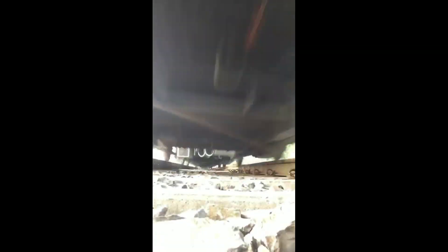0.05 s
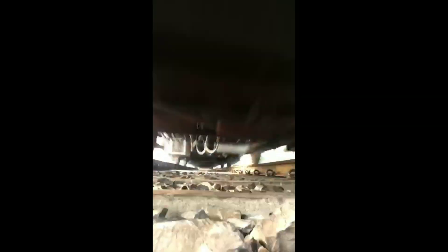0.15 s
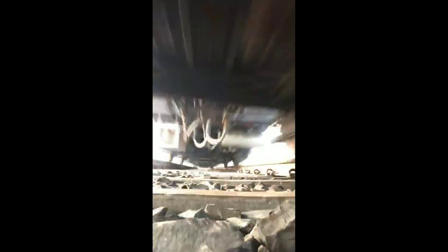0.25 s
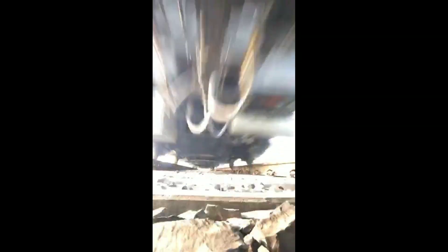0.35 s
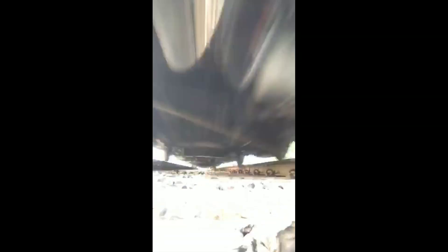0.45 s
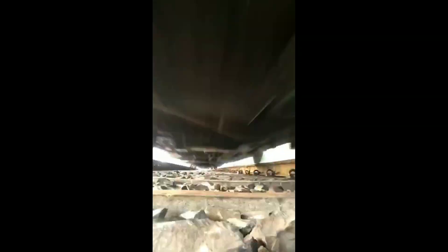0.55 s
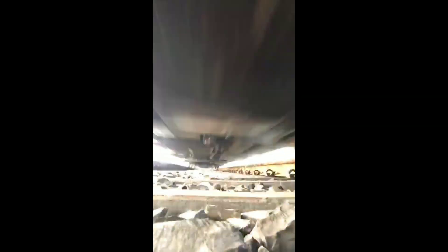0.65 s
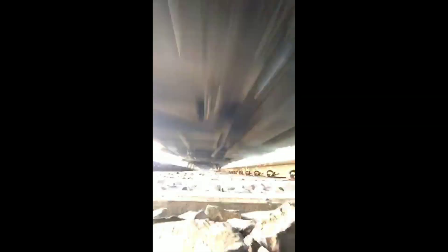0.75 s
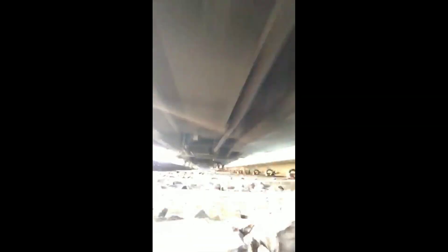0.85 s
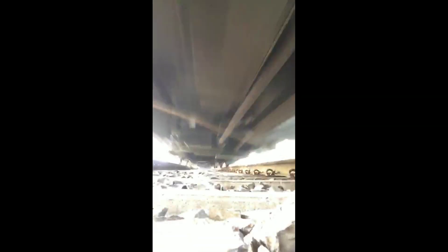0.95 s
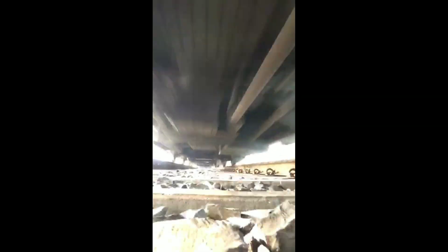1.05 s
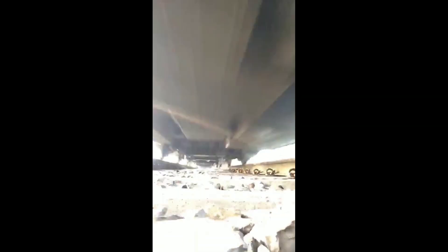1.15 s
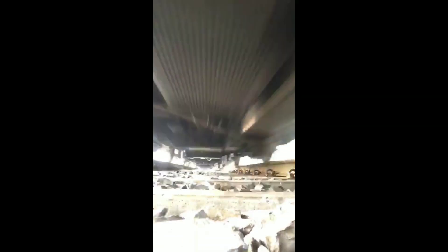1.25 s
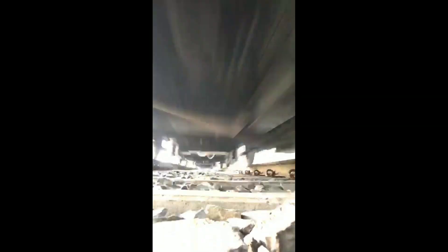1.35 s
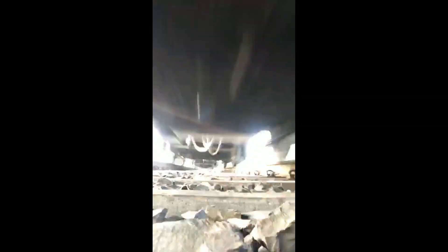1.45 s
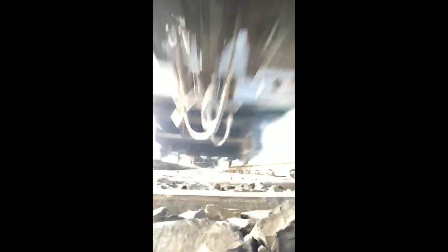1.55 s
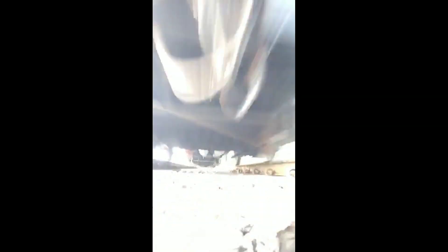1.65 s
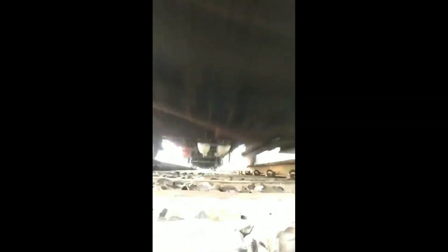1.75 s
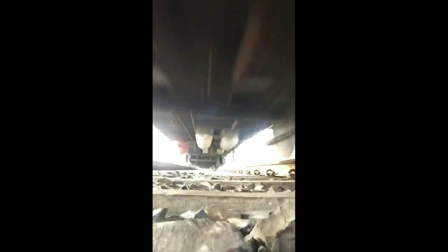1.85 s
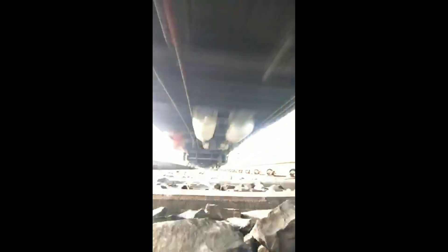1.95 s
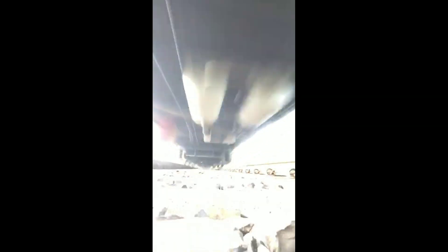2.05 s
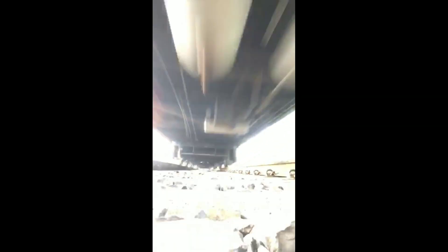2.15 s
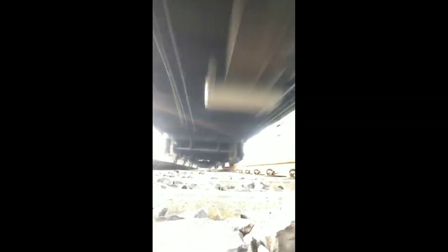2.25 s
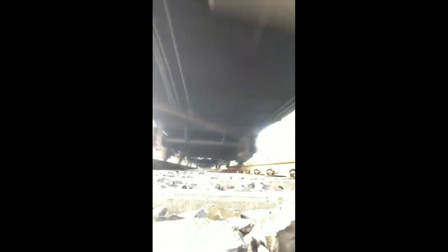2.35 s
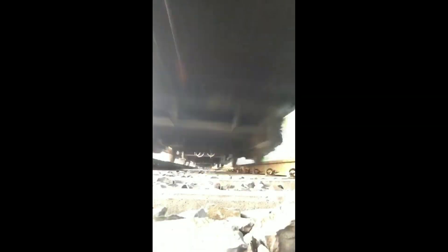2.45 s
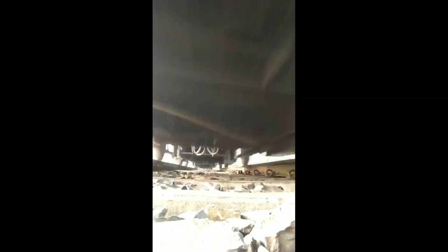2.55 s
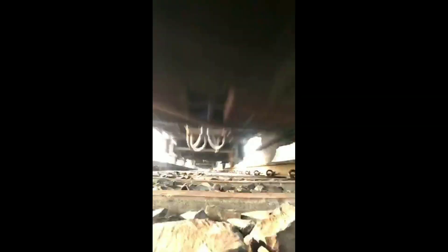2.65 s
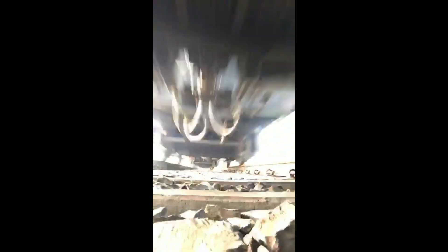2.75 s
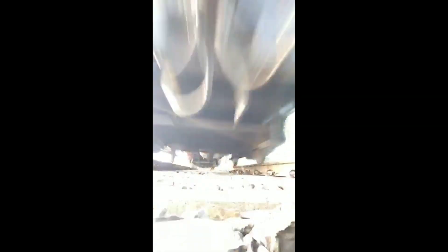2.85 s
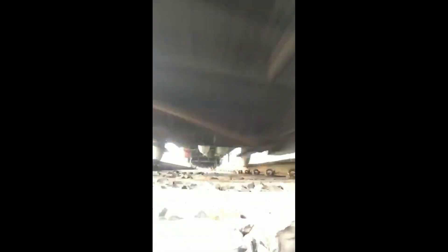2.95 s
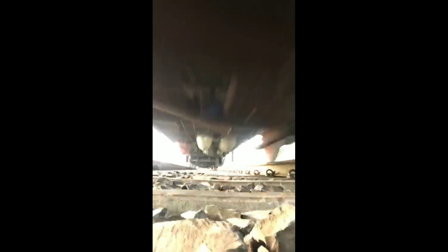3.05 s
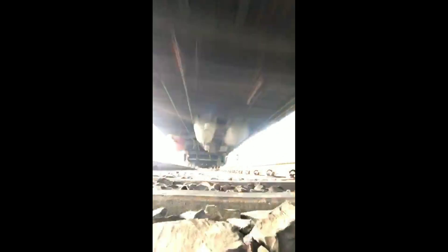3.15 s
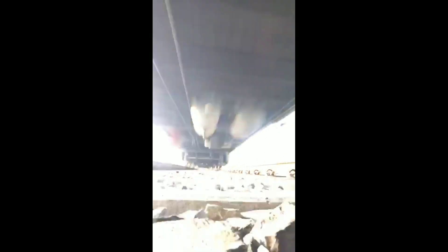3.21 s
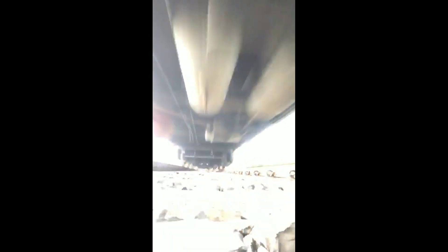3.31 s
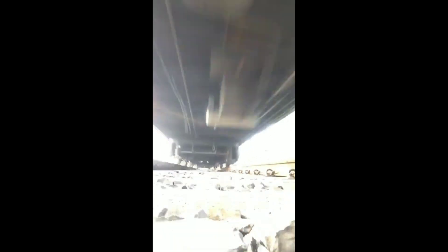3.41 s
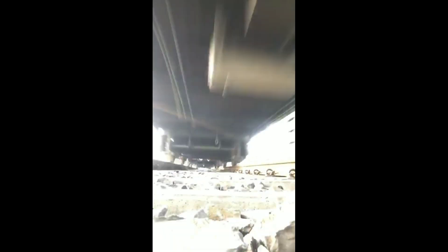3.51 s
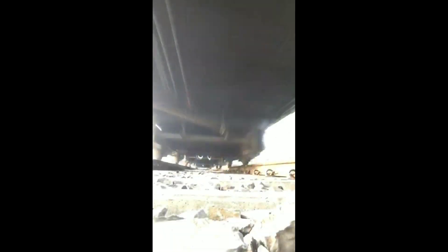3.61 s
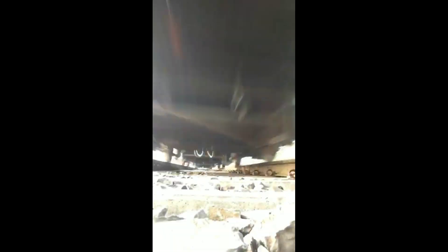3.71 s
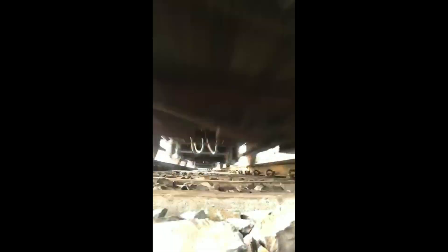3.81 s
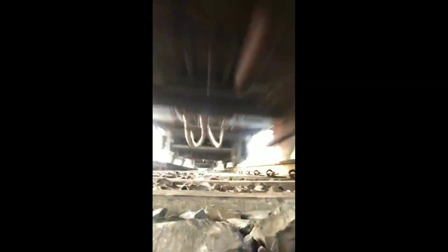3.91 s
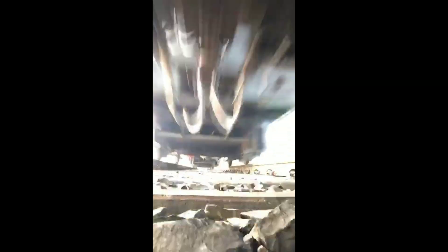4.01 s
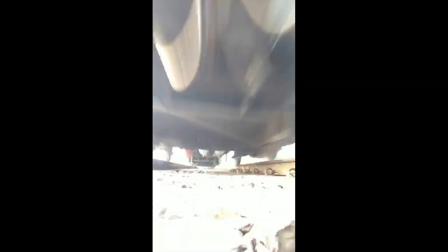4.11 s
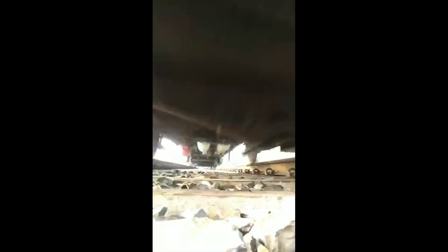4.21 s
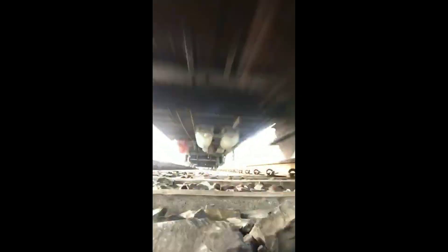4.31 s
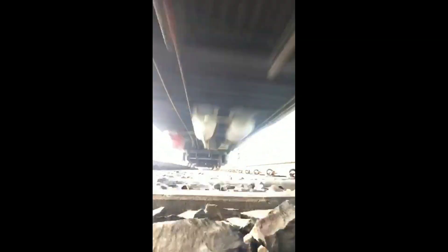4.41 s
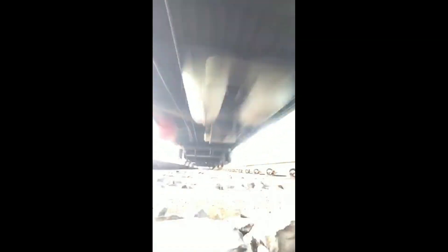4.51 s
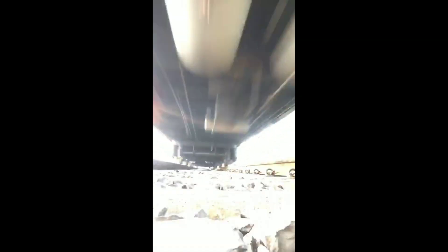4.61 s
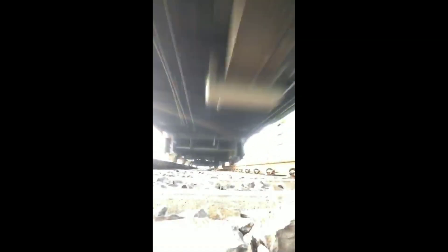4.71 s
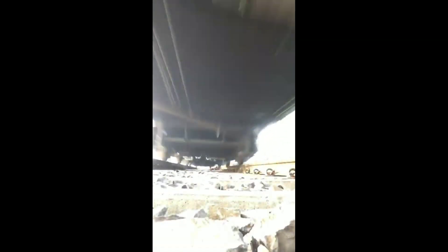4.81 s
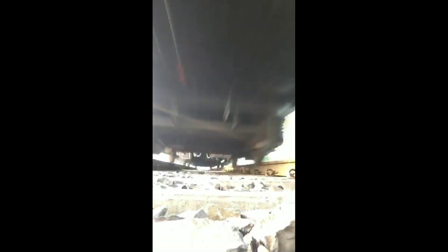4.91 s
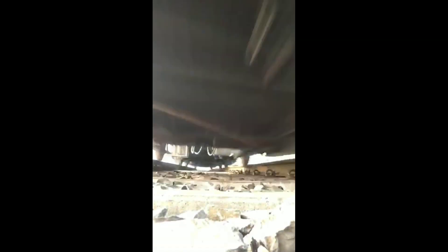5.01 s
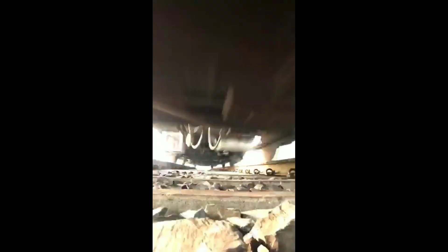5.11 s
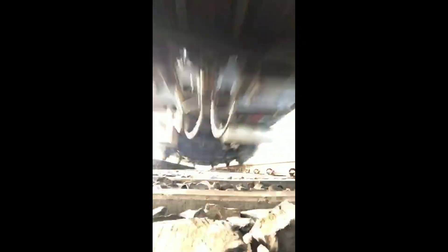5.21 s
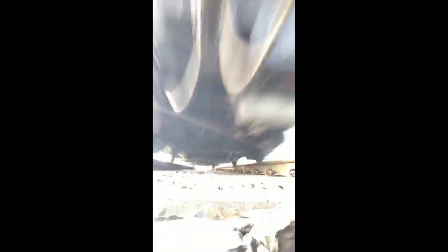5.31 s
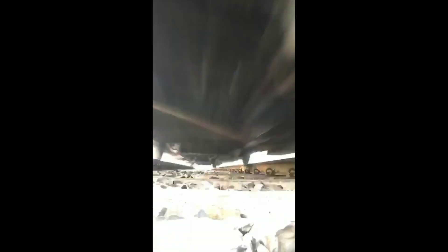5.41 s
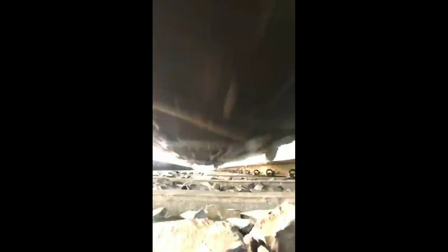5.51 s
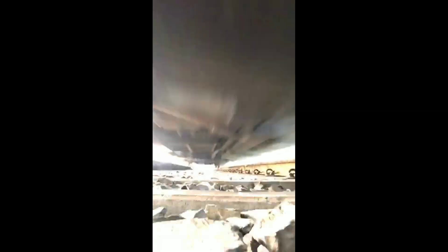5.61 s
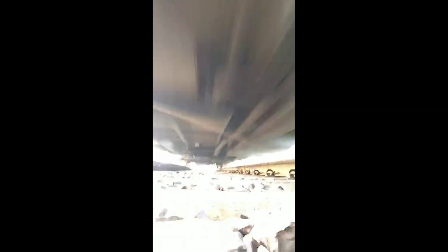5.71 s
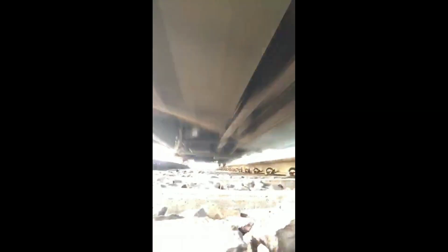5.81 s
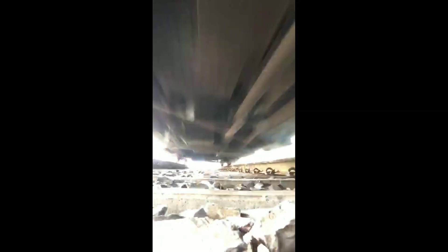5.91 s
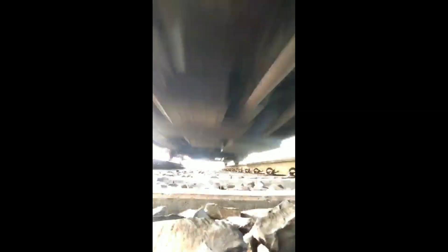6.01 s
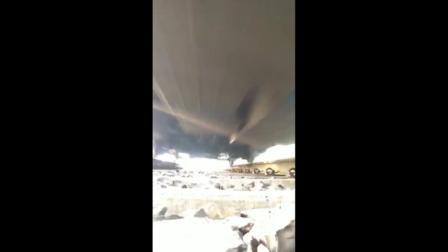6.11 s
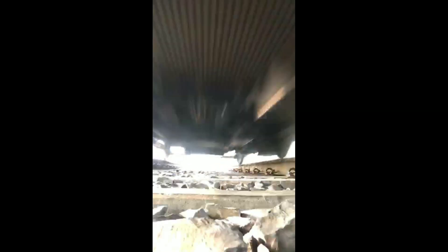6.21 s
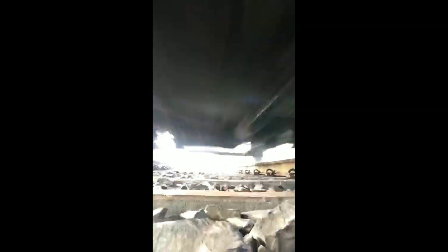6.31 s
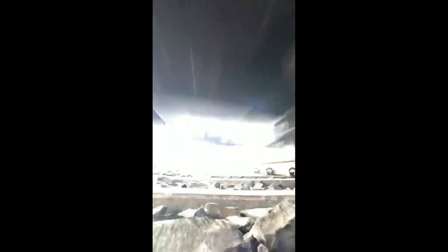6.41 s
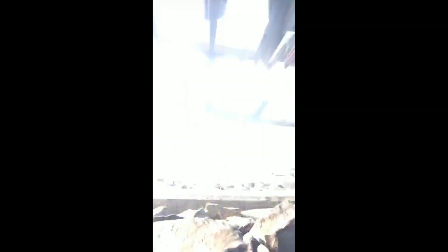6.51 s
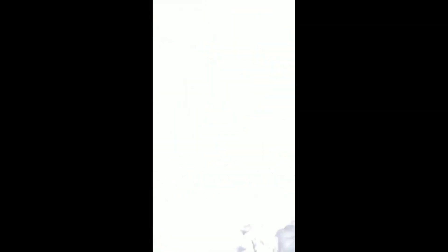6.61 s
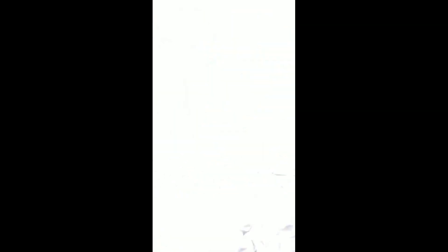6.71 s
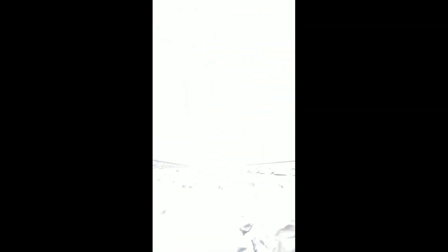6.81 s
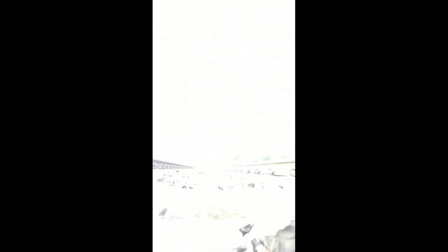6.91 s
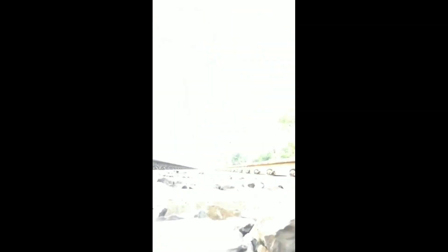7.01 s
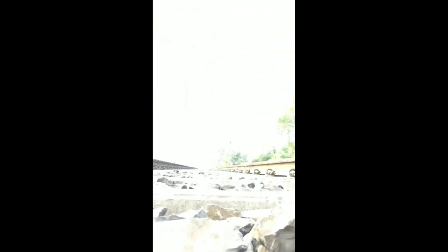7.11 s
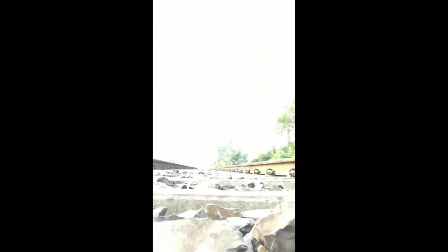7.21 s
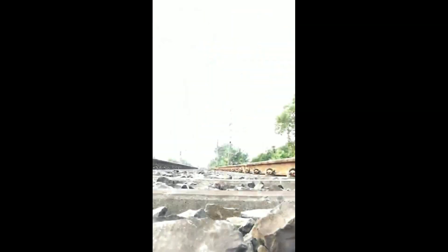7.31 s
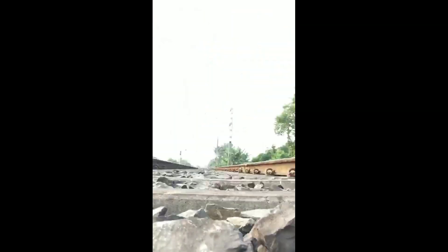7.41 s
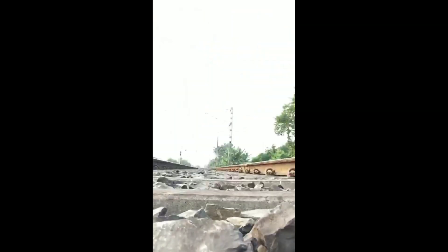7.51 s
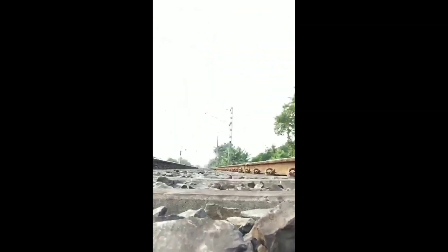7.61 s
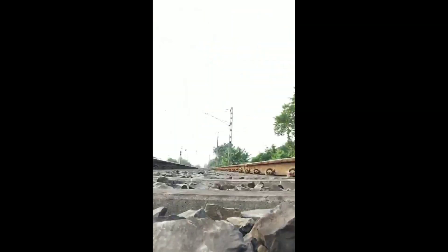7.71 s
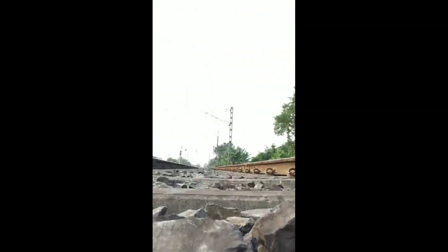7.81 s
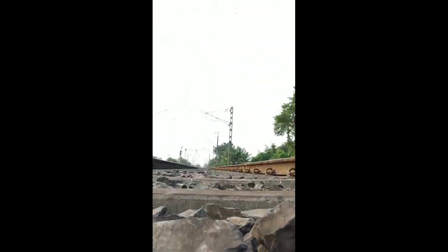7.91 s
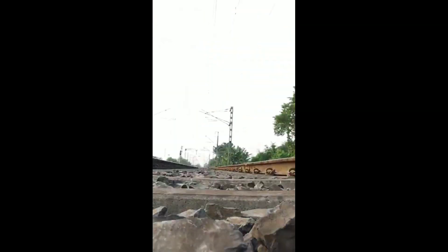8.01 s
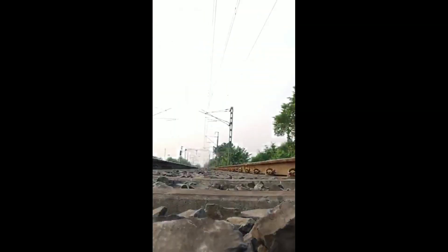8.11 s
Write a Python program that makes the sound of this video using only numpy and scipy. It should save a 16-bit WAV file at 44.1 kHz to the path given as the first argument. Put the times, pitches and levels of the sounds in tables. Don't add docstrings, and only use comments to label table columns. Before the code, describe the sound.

Open-air railway track, microphone on the stones between the rails, with a train passing overhead. At 0 seconds a low gust and distant joint ticks and knocks; from 0.4 the first close steel bangs, four axles by 0.95. Similar fast groups follow around 1.6-2.2, 2.8-3.4, 4.1-4.6 and 5.3-5.9, each a clattering crack with a low thud. Between them rough roar, metallic ring and hiss swell and sink, with hollow sleeper thumps about every 1.2 seconds. A gear whine near 1100 hertz swells and falls at 0.3-0.8, returning briefly at 1.5, 4.9 and 5.8. Wind slaps buffet throughout. Air vents softly at 6.15. The last bangs hit at 6.5 and 6.7, and the roar drops away. From 6.8 ragged rasping wake, deep wind thumps and dry grit ticks dominate, thinning out by 8 as the rail hiss recedes.

```python
import sys
import numpy as np
from scipy import signal
from scipy.io import wavfile
from scipy.ndimage import uniform_filter1d, minimum_filter1d

SR = 44100
rng = np.random.default_rng(int(sys.argv[2]) if len(sys.argv) > 2 else 0)


def magnitude_from_level(level_db):
    exponent = np.asarray(level_db, float) / 20
    return 10 ** exponent


def wav_out(sig):
    wavfile.write(sys.argv[1], SR, np.round(np.clip(np.atleast_2d(sig).T, -1, 1) * 32767).astype(np.int16))


N = 359415
LAST_CAR_S = 6.54

# start in seconds, blow in dB, crack in dB, thud in dB,
# tread roughness in dB.
AXLES = [(0.385, -10.5, -18.5, -11.5, 0), (0.551, -12.5, -20, -28, -6), (0.777, -9, -17.5, -27, 5.5),
         (0.94, -13.5, -20, -10.5, -1), (1.61, -13.5, -17.5, -14, 3.5), (1.775, -13.5, -21, -20, -1),
         (2.001, -11, -18.5, -8.5, -1), (2.166, -10.5, -19, -6, -1), (2.836, -10, -17, -14, 1),
         (3.002, -12, -21, -9, -4), (3.23, -9.5, -18.5, -17, 1), (3.394, -13.5, -21, -9.5, -1.5),
         (4.066, -12, -18, -8.5, 1), (4.232, -13.5, -20.5, -12.5, -13), (4.461, -11.5, -18, -6.5, 0.5),
         (4.627, -12.5, -20.5, -9.5, -2.5), (5.301, -13.5, -19, -10.5, 2), (5.467, -12, -21.5, -36, -9),
         (5.695, -10.5, -17.5, -14, 4), (5.862, -14, -20.5, -9, 2.5), (6.538, -11.5, -17, -12.5, 4),
         (6.705, -12.5, -20.5, -19, -0.5)]
# start in seconds, blow in dB, crack in dB, sizzle in dB.
TIGHT_JOINT = [(0, -19, -32, -42), (0.138, -29, -44, -39), (1.207, -15, -29.5, -42),
               (1.37, -26, -41, -38.5), (2.437, -16.5, -31, -41.5), (2.6, -18.5, -36, -41),
               (2.687, -24, -34, -38.5), (3.661, -17, -31.5, -40), (3.83, -19, -36, -43),
               (4.901, -16.5, -38, -41), (5.062, -25, -45, -46), (5.18, -23, -39, -27),
               (6.3, -42, -52, -42)]
# start in seconds, blow in dB, crack in dB, thud in dB.
LOOSE_JOINTS = [(0.068, -17.5, -26.5, -23), (0.231, -38, -29.5, -26), (0.92, -20, -36, -19),
                (1.289, -22, -40, -6.5), (1.458, -24, -31, -13), (1.535, -19, -37, -34),
                (1.733, -40, -46, -35), (2.142, -21, -39, -32), (2.25, -33, -54, -25),
                (2.514, -18, -31, -40), (3.739, -23, -39, -25), (3.924, -24, -27.5, -30),
                (4.135, -17, -33, -35), (4.31, -21, -35, -16), (4.435, -20, -41, -19),
                (4.987, -15.5, -27, -7), (5.271, -35, -39, -40), (5.54, -21, -39, -7.5),
                (5.669, -37, -43, -12), (5.791, -16, -38, -29), (6.205, -20.5, -33, -15),
                (6.385, -22, -28, -4), (6.491, -16, -45, -8)]
# frequency in Hz, width in Hz, level in dB.
RAIL_MODES = [(589, 110, 9), (742, 150, 1.5), (859, 130, 12.5), (1015, 130, 8.5), (1126, 72, -0.5),
              (1335, 150, -15.5)]
# frequency in Hz, width in Hz, level in dB.
WHEEL_MODES = [(1510, 150, 9.1), (1710, 160, 19.4), (2020, 230, 27.6), (2296, 310, 24.5), (2600, 260, 28.5),
               (3060, 440, 15), (3450, 310, 23.6), (3750, 150, 8.6)]
# level in dB, approach in dB/s, leaving in dB/s,
# share of tread roughness, distant train in dB.
WHEEL_PASS = [
    (-25, 22, 55, 1.04, -29),
    (-41, 5, 97.5, 0.83, -50.5),
    (-47.5, 7.5, 121, 1.2, -70.5),
]
# level in dB, approach in dB/s, leaving in dB/s,
# share of tread roughness, distant train in dB.
GROAN_PASS = (-35.5, 24, 60.5, 2.04, -60.5)
# frequency in Hz, density in dB per Hz.
ROAR = [(110, -29), (180, -2.5), (209, -14.5), (257, -2), (280, -5.5), (376, -6.5), (513, -9), (602, -10.5),
        (652, -14), (693, -8), (806, -17), (1020, -11), (1220, -28), (1500, -31.5), (1950, -50.5),
        (3300, -120)]
# frequency in Hz, density in dB per Hz.
RING = [(760, -21.5), (1300, -5), (1410, -1), (1820, -2), (1970, 2.5), (2150, -0.5), (3060, -3.5),
        (3880, -6), (5000, -28), (6500, -36.5), (11000, -120)]
# frequency in Hz, density in dB per Hz.
HISS = [(2650, -16), (4500, 9), (4960, 2), (5660, 5.5), (10600, -5), (11300, -9), (11900, -9.5),
        (12500, -24.5), (16200, -69.5), (22000, -120)]
# frequency in Hz, width in Hz, level in dB.
RAIL_SONG = [(419, 55, -14), (603, 69, -13.5), (860.4, 48, -14.5), (1098, 78, -14)]
# frequency in Hz, width in Hz, level in dB.
WHEEL_SONG = [(1730, 90, -12.5), (2192, 120, -7.5), (2383, 70, -12.5), (3430, 140, -19.5)]
# time in seconds, tooth mesh in Hz, load in dB.
WHINE = [
    [(.27, 1116, -40), (.33, 1117, -26), (.43, 1115, -27), (.49, 1115, -24), (.55, 1116, -22)],
    [(.55, 1107, -23), (.59, 1112, -19), (.622, 1114, -16.5), (.648, 1119, -18.5), (.685, 1093, -14),
     (.705, 1080, -12.5), (.73, 1080, -18.5), (.77, 1060, -41)],
    [(1.52, 1063, -29), (1.55, 1065, -23), (1.6, 1020, -36.5)],
    [(4.88, 1089, -10), (4.91, 1077, -29), (5.0, 1123, -35), (5.12, 1120, -42)],
    [(5.77, 1075, -28), (5.795, 1064, -17), (5.83, 1070, -33)],
]
# multiple of the mesh rate, width in Hz, level in dB,
# growth in dB per dB of load.
WHINE_ORDERS = [(.5, 40, -1.5, 1.2), (1, 55, 1, 0.91), (1.5, 90, -22.5, 1.5), (1.9, 120, -15, 1.8),
                (2, 80, -12.5, 1.2), (3.5, 2000, -21.5, 1.2), (4, 200, -35, 1.9)]
# start in seconds, peak in dB, pitch in Hz.
SLEEPER = [(0.067, -7, 490), (1.29, -4.5, 440), (2.516, -4, 450), (3.742, -4, 466), (4.981, -6.5, 464),
           (6.207, -9, 525)]
# centre in seconds, length in seconds, level in dB.
VENT = (6.15, 0.11, -39.5)
# centre in seconds, peak in dB, half length in seconds.
GUSTS = [(.03, -14.5, .06), (.24, -22, 0.017), (.57, -15, 0.021), (.74, -17, 0.19), (1.3, -19, 0.093),
         (1.55, -14.5, 0.21), (1.85, -12.5, 0.047), (2.02, -11.5, 0.0082), (2.25, -18.5, 0.059),
         (2.45, -18, .08), (2.66, -12.5, 0.06), (2.84, -21, 0.021), (2.98, -16, 0.14), (3.3, -15.5, 0.06),
         (3.43, -12, 0.024), (3.68, -12, 0.077), (3.85, -13.5, 0.11), (4.35, -24, 0.1), (4.7, -21, 0.21),
         (5.1, -18, 0.14), (5.45, -15, 0.14), (5.71, -15.5, 0.043), (6.2, -17, 0.14), (6.62, -23, 0.12),
         (6.99, -16, 0.02), (7.13, -15, 0.044), (7.35, -21, 0.16), (7.57, -20, 0.049), (7.79, -23, 0.035),
         (8.13, -23, 0.056)]
# frequency in Hz, density in dB per Hz.
BUFFET = [(12, -46), (20, -30.5), (36, 4.5), (86, -0.5), (140, -5), (195, -9), (233, -15.5), (408, -24),
          (879, -35.5), (1050, -37), (9000, -94.5), (11700, -128), (19800, -120)]
# start in seconds, peak in dB, pitch in Hz,
# sharp edge in dB.
SLAPS = [(0.23, -2.5, 69.6, -22), (1.372, -2, 95, -22), (1.458, -1, 61.9, -20.5), (1.539, 2, 69.6, -13.5),
         (2.252, 3.5, 103, -14), (2.372, 3, 131, -28), (2.391, -17, 102, -16), (2.639, -3, 67.3, -23),
         (3.632, 6.5, 215, -16), (3.669, -3, 61.9, -14.5), (3.796, -9, 89, -17), (6.22, 1, 63.5, -18),
         (6.97, -1, 75, -28), (7.048, 0, 84, -27), (7.104, 1, 71, -20.5), (7.139, 5, 75, -30.5),
         (7.222, -10, 107, -42), (7.239, 0, 74, -31), (7.31, -0.5, 99.6, -43), (7.362, -2, 61.6, -33),
         (7.387, -3, 264, -31), (7.395, -1.5, 88.8, -32), (7.48, -7, 59.6, -35), (7.535, -14, 71, -40),
         (7.57, -2.5, 140, -40), (7.748, -21, 61.9, -45), (7.797, -6.5, 67, -50), (7.925, -7, 124, -61),
         (8, -8.5, 80, -51)]
# centre in seconds, peak in dB, half length in seconds.
TEARS = [(6.85, -26.5, 0.04), (6.975, -21.5, 0.029), (7.055, -20, 0.029), (7.125, -21.5, 0.013),
         (7.19, -29, 0.027), (7.245, -26.5, 0.03), (7.365, -24, 0.0049), (7.395, -22.5, 0.02),
         (7.483, -24, 0.019), (7.545, -27, 0.0079), (7.578, -37, 0.01), (7.638, -35, 0.0087),
         (7.74, -26.5, 0.0078), (7.8, -34, 0.015), (7.935, -31.5, 0.0062), (8.03, -37, 0.033),
         (8.145, -33, 0.0091)]
# frequency in Hz, density in dB per Hz.
RASP = [(150, -37), (250, -1.5), (407, -15.5), (632, -11), (816, -17.5), (885, -15.5), (1030, -19.5),
        (4000, -73), (5200, -92.5), (8800, -120)]
# frequency in Hz, density in dB per Hz.
RECEDING = [(880, -25.5), (1500, -6), (3090, -21.5), (3460, -19.5), (4900, -29), (9490, -36.5),
            (12000, -49.5), (15600, -76), (22000, -120)]
# start in seconds, peak in dB, brightness in Hz.
GRIT = [(6.951, -30, 1300), (6.9757, -24, 1300), (6.9815, -28, 1300), (7.002, -27, 1300),
        (7.0294, -25, 1310), (7.0497, -21, 1300), (7.0718, -28, 1300), (7.106, -24.5, 1300),
        (7.1377, -25.5, 1290), (7.1794, -31, 1300), (7.201, -33.5, 1300), (7.2383, -27, 1300),
        (7.2706, -29, 1300), (7.3248, -37, 1300), (7.3657, -34, 1290), (7.3926, -28, 1300),
        (7.4004, -25, 1290), (7.468, -32, 1290), (7.4805, -28, 1300), (7.544, -40, 1300),
        (7.574, -37, 1290), (7.638, -40, 1300), (7.7338, -42, 1300), (7.7508, -39, 1300),
        (7.7867, -44, 1290), (7.8077, -41, 1310), (7.8875, -45, 1300), (7.9344, -47, 1300),
        (8.1189, -43, 1300)]


def joints():
    out = np.zeros(N)
    for s, blow_db, crack_db, thud_db, _ in AXLES:
        echo = 0.14 * (s < LAST_CAR_S)
        add(out, s, clack(blow_db, crack_db, crack_db - 8.5, thud_db, t60=.14, rise=0.00088, echo=echo))
    far = [(s, blow_db, crack_db, sizzle_db, blow_db - 2)
           for s, blow_db, crack_db, sizzle_db in TIGHT_JOINT]
    far += [(s, blow_db, crack_db, crack_db - 23, thud_db)
            for s, blow_db, crack_db, thud_db in LOOSE_JOINTS]
    for s, *blow in far:
        add(out, s, magnitude_from_level(-6.5) * clack(*blow, t60=0.31, rise=0.0031, top_hz=3500))
    return out


def clack(blow_db, crack_db, sizzle_db, thud_db, t60, rise, echo=0.048, top_hz=7570):
    t = np.arange(int(.22 * SR)) / SR
    noise, chance, hiss = rng.standard_normal((3, len(t)))
    chatter = noise * (0.46 + 1.5 * (chance > 2.2))
    chatter[0] += 6.0

    rail_ring = struck(RAIL_MODES, chatter, spread=0.023)
    wheel_ring = struck(WHEEL_MODES, chatter, spread=0.051)
    rail = band(rail_ring + evened(chatter), 528, 1277, order=4)
    wheel = band(wheel_ring + 0.39 * evened(chatter), 1300, top_hz, order=3)
    sizzle = band(hiss + 0.69 * chatter, 2900, 10000, order=1)
    sizzle = sizzle * (1 + 1.1 * np.exp(-t / 0.0074))
    rail = rail * (1.0 + np.exp(-t / 0.014))
    layers = [(blow_db, rail), (crack_db, wheel), (sizzle_db, sizzle)]
    body = sum(magnitude_from_level(db) * x / np.std(x[:800]) for db, x in layers)

    held = np.maximum(t - .012, 0)
    shape = np.minimum(t / rise, 1) * (magnitude_from_level(-60 * held / t60) + echo * magnitude_from_level(-60 * t / 0.59))
    thud = np.sin(2 * np.pi * rng.uniform(156, 289) * t) + 0.5 * band(noise, 100, 360, order=2)
    thud = thud * np.minimum(t / 0.006, 1) * magnitude_from_level(-60 * t / 0.06)
    return (shape * body + magnitude_from_level(thud_db + 8.0) * thud) * np.minimum((t[-1] - t) / .05, 1)


def struck(modes, drive, spread):
    detune = 1 + spread * rng.standard_normal(len(modes))
    return evened(sum(magnitude_from_level(db) * mode(drive, hz * d, width) / np.sqrt(width)
                      for (hz, width, db), d in zip(modes, detune)))


def rolling():
    roar_gain, ring_gain, hiss_gain = (passing(*layer) for layer in WHEEL_PASS)
    tremble, rattle = flicker(hz=30), flicker(hz=140)
    contact = rng.standard_normal(N)
    roar = patchy(ROAR, patchy_db=1.5, size=1024) + song(RAIL_SONG, contact)
    ring = patchy(RING, patchy_db=1.2, size=512) + song(WHEEL_SONG, contact)
    hiss = patchy(HISS, patchy_db=.8, size=512)
    roar = roar_gain * magnitude_from_level(1.65 * tremble + 1.83 * rattle) * roar
    ring = ring_gain * magnitude_from_level(0.42 * tremble + 0.87 * rattle) * ring
    hiss = hiss_gain * magnitude_from_level(0.56 * tremble + 0.57 * rattle) * hiss
    groan = passing(*GROAN_PASS) * magnitude_from_level(2.3 * tremble) * band(rng.standard_normal(N), 200, 353, order=2)
    behind = np.arange(N) / SR - LAST_CAR_S
    body_fade = np.clip((.3 - behind) / .15, 0, 1)
    hiss_fade = np.clip((.14 - behind) / .1, 0, 1)
    return (roar + groan + ring) * body_fade + hiss * hiss_fade


def passing(level_db, coming_db, leaving_db, share, distant_db):
    step = 64
    s, rough_db = np.transpose(AXLES)[[0, -1], :, None]
    since = np.arange(0, N + step, step) / SR - s
    slope = np.where(since < 0, coming_db - 23.7 * since, -leaving_db)
    wheel_db = level_db + share * rough_db + slope * since
    power = np.repeat(magnitude_from_level(2 * wheel_db).sum(0), step)[:N]
    return np.sqrt(power + magnitude_from_level(2 * distant_db))


def song(modes, drive):
    return sum(magnitude_from_level(db) * evened(mode(mode(drive, hz, w), hz, w)) for hz, w, db in modes)


def whine():
    out = np.zeros(N)
    full_load_db = -16
    tone_share = 0.43
    for rows in WHINE:
        s, *columns = np.transpose(rows)
        t = np.arange(s[0], s[-1], 1 / SR)
        mesh_hz, load_db = (np.interp(t, s, c) for c in columns)
        steady = evened(np.sin(2 * np.pi * np.cumsum(mesh_hz) / SR))
        total = np.zeros(len(t))
        for k, width, db, growth in WHINE_ORDERS:
            noise = rng.standard_normal(len(t))
            wavering = evened(resonate(resonate(noise, k * mesh_hz, width), k * mesh_hz, width))
            order = (1 - tone_share / (1 + (k - 1) ** 2)) * wavering + tone_share * (k == 1) * steady
            total += magnitude_from_level(full_load_db + db + growth * (load_db - full_load_db)) * order
        add(out, s[0], total * signal.windows.tukey(len(t), .25))
    return out


def sleeper():
    out, t = np.zeros(N), np.arange(3000) / SR
    decay = magnitude_from_level(-60 * np.maximum(t - .01, 0) / 0.076)
    for s, db, hz in SLEEPER:
        hollow = evened(mode(mode(rng.standard_normal(len(t)), hz, 340), hz, 340))
        add(out, s, magnitude_from_level(db - 8.5) * hollow * np.minimum(t / 0.0033, 1) * decay)
    return out


def vent():
    s, length, db = VENT
    swell = np.exp(-((np.arange(N) / SR - s) / length) ** 2 / 2)
    return magnitude_from_level(db) * swell * band(rng.standard_normal(N), 4200, 11500, order=1)


def slipstream():
    behind = np.maximum(np.arange(N) / SR - LAST_CAR_S, 0)
    draught_db = -21 - 2.5 * behind
    air = evened(patchy(BUFFET, patchy_db=1.0, size=2048) * magnitude_from_level(1.5 * flicker(hz=22.2)))
    out = np.sqrt(swells(GUSTS) + magnitude_from_level(2 * draught_db)) * air
    out = signal.sosfilt(signal.butter(4, 40, "high", fs=SR, output="sos"), out)
    t = np.arange(2600) / SR
    late = np.maximum(t - .003, 0)
    for s, db, hz, edge_db in SLAPS:
        swing = -np.sin(2 * np.pi * hz * t) * np.exp(-t * hz / 0.66) * (1 - np.exp(-(t / 0.0014) ** 2))
        tick = band(rng.standard_normal(len(t)) * late * np.exp(-late / 0.0014), 300, 500, order=1)
        tick = signal.lfilter(*signal.butter(4, 2100, fs=SR), tick)
        add(out, s, magnitude_from_level(db - 3.0) * swing + magnitude_from_level(edge_db - 13.5) * tick)
    return signal.lfilter(*signal.butter(1, 25, "high", fs=SR), out)


def wake():
    t = np.arange(N) / SR
    behind = t - 6.74
    clumps = evened(magnitude_from_level(5.0 * flicker(hz=80)))
    rasp = np.sqrt(swells(TEARS) + magnitude_from_level(2 * -43)) * patchy(RASP, patchy_db=1.5, size=512) * clumps
    cut_db = -6.5 * np.clip((t - 7.28) / .02, 0, 1)
    hiss_gain = magnitude_from_level(-47.5 - 21.5 * behind + cut_db) + magnitude_from_level(-70.5)
    hiss = hiss_gain * patchy(RECEDING, patchy_db=0.5, size=512)
    return (rasp + hiss) * np.clip(behind / 0.045, 0, 1)


def grit():
    out, t = np.zeros(N), np.arange(500) / SR
    for s, db, hz in GRIT:
        tick = rng.standard_normal(len(t)) * np.exp(-t / .0024)
        tick = signal.lfilter(*signal.butter(2, [200, hz], "bandpass", fs=SR), tick)
        tick = signal.lfilter(*signal.butter(3, 2800, fs=SR), tick)
        add(out, s, magnitude_from_level(db - 0.5) * tick / abs(tick).max())
    return out


def swells(rows):
    s, db, half = np.transpose(rows)[:, :, None]
    t = np.arange(0, N / SR + .002, .001)
    power = (magnitude_from_level(2 * db) * np.exp(-((t - s) / np.maximum(half, .004)) ** 2)).sum(0)
    return np.interp(np.arange(N) / SR, t, power)


def patchy(spectrum, patchy_db, size):
    frames, hz = 4 * N // size + 5, np.fft.rfftfreq(size, 1 / SR)
    a, b, patches = rng.standard_normal((frames, len(hz), 3)).T
    patches = uniform_filter1d(patches, size=size // 128, axis=0)
    patches = evened(uniform_filter1d(patches, size=8192 // size, axis=1))
    f, db = np.transpose(spectrum)
    colour_db = np.interp(np.log(hz + 1), np.log(f), db, left=-90, right=-90)[:, None]
    z = (a + 1j * b) * magnitude_from_level(colour_db + patchy_db * patches)
    return evened(signal.istft(z, nperseg=size, noverlap=3 * size // 4)[1][:N])


def flicker(hz):
    return evened(signal.lfilter(*signal.butter(2, hz, fs=SR), rng.standard_normal(N)))


def mode(x, hz, width):
    pole = np.exp((2j * hz - width) * np.pi / SR)
    return 2 * signal.lfilter([1 - abs(pole)], [1, -pole], x).real


def resonate(x, hz, width):
    turn = np.exp(2j * np.pi * np.cumsum(hz * np.ones(len(x))) / SR)
    r = np.exp(-np.pi * width / SR)
    return 2 * (turn * signal.lfilter([1 - r], [1, -r], x / turn)).real


def band(x, lo_hz, hi_hz, order=2):
    sos = signal.butter(order, [lo_hz, hi_hz], "bandpass", fs=SR, output="sos")
    return evened(signal.sosfilt(sos, x))


def evened(x):
    return x / np.sqrt(np.mean(x ** 2) + 1e-20)


def add(mix, s, sound):
    part = mix[round(s * SR):][:len(sound)]
    part += sound[:len(part)]


def scene():
    train = joints() + rolling() + whine() + sleeper() + vent()
    return (train + slipstream() + wake() + grit())[None]


def roll_off(x):
    return signal.sosfilt(signal.butter(12, 12610, fs=SR, output="sos"), x)


def record(dry):
    peak = -minimum_filter1d(-abs(dry), size=201, axis=1)
    held = dry / uniform_filter1d(np.maximum(peak / .99, 1), size=151, axis=1)
    low_pass = signal.firwin(201, 11850, window=("kaiser", 9), fs=SR)
    narrow = signal.oaconvolve(held, low_pass[None], "same")
    return roll_off(np.clip(narrow, -1, 1))


dry = scene()
out = record(dry)
wav_out(out)
```